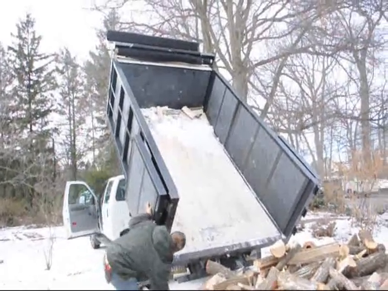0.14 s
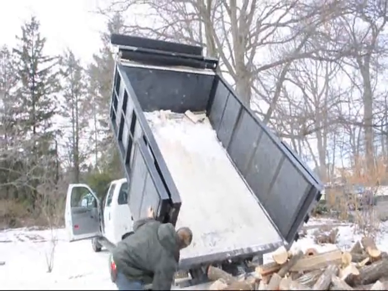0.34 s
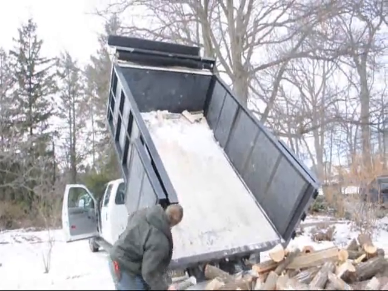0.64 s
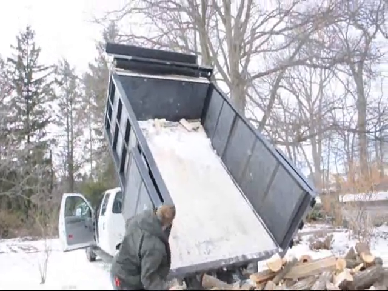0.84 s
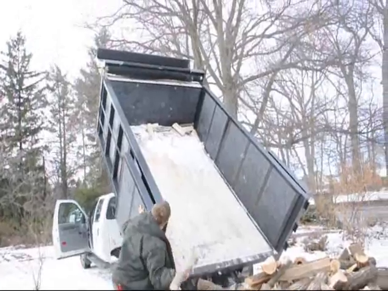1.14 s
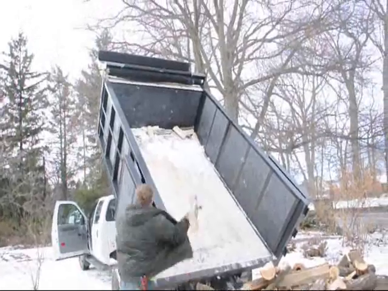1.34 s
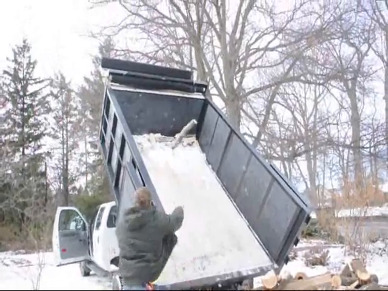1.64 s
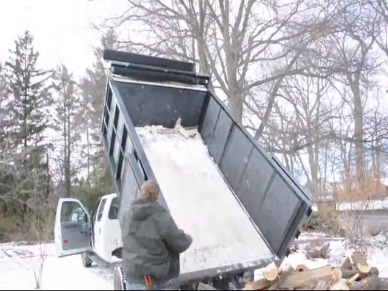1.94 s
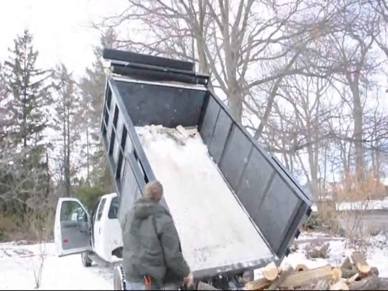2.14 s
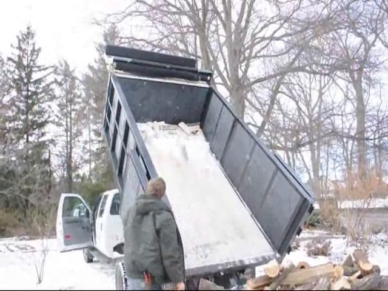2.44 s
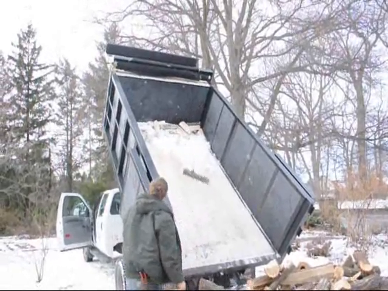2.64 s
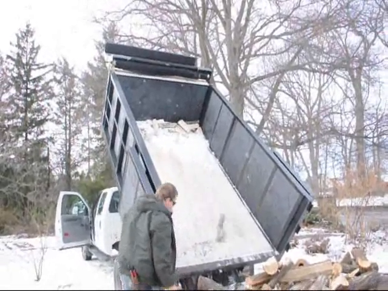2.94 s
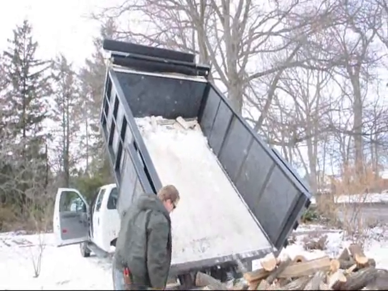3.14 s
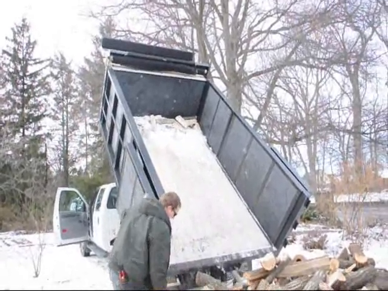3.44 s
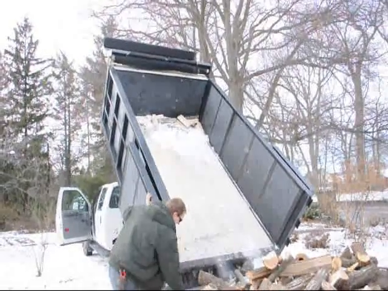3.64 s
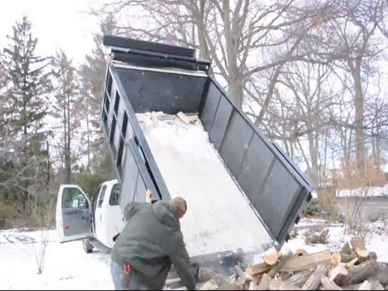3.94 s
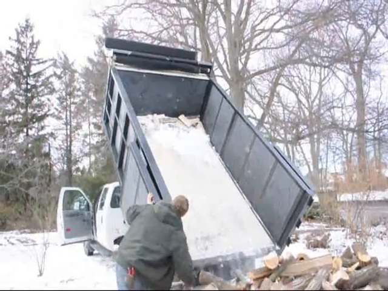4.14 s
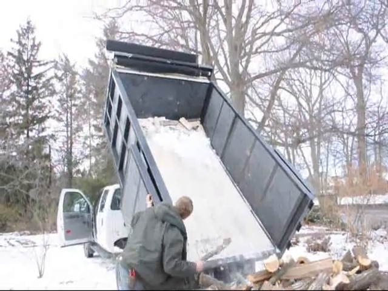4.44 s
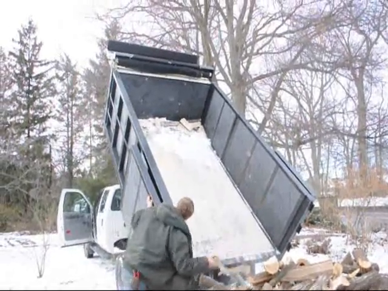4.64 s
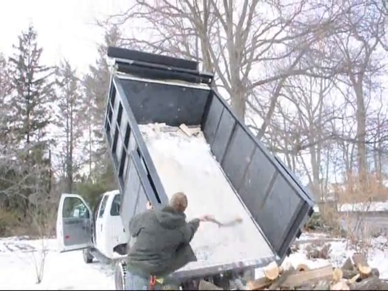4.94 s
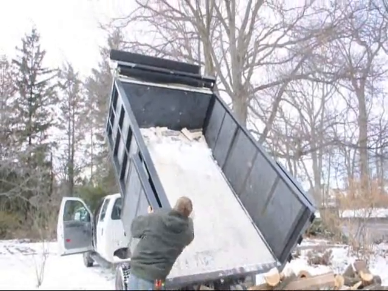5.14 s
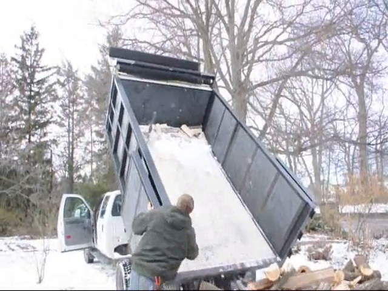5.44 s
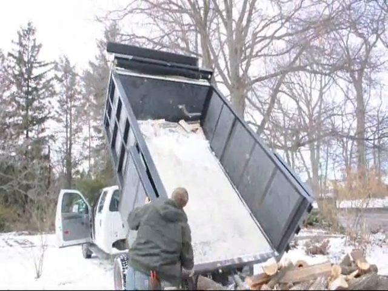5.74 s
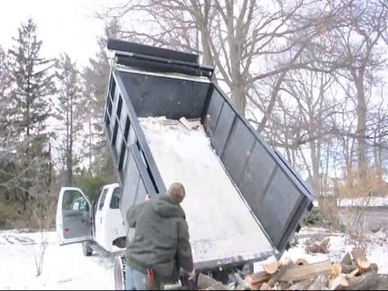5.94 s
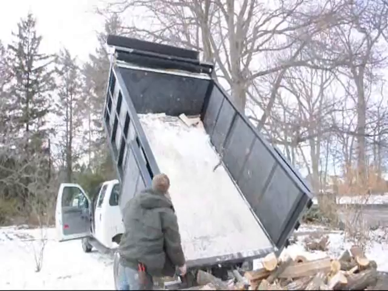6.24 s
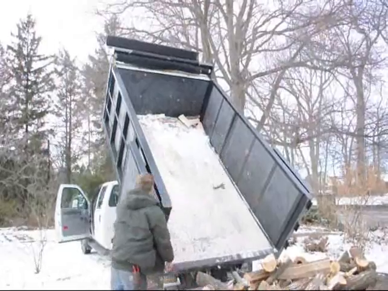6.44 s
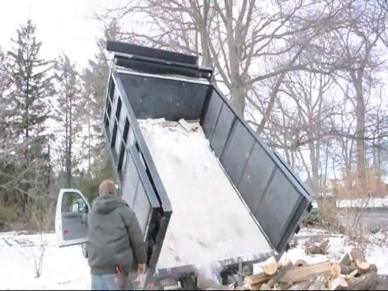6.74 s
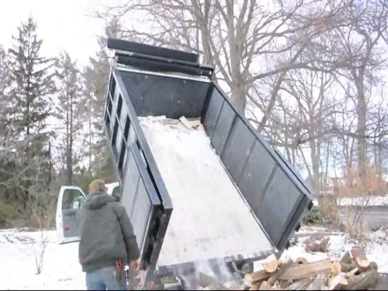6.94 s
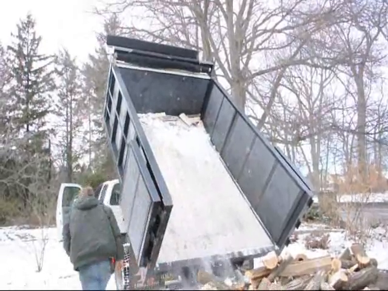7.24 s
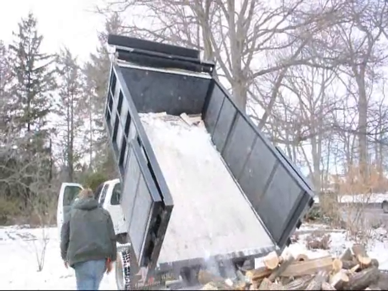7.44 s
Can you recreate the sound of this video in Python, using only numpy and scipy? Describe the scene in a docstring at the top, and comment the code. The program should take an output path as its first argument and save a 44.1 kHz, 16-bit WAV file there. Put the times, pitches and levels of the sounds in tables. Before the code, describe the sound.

Firewood tumbles down a steel dump truck bed in two bursts of booms and knocks, over an idling engine and passing cars.

```python
"""A dump truck idles while a car fades down the road. After one soft blow, firewood tumbles down the
raised steel bed onto a woodpile at 2-3 s: panels boom, logs knock, split faces clack, bark and ice crunch.
From 4 s another car nears. More wood falls at 5-7 s, from 6 s also scraping over the frozen floor.
Throughout, gain control ducks loud blows, a coarse sample-and-hold adds treble images and peaks clip."""
import sys
import numpy as np
from scipy import signal
from scipy.fft import rfft, irfft
from scipy.io import wavfile
from scipy.ndimage import uniform_filter1d

SR = 44100
rng = np.random.default_rng(int(sys.argv[2]) if len(sys.argv) > 2 else 0)


def file_out(sig):
    """Save sig as 16-bit WAV at sys.argv[1]."""
    # one column per channel
    cols = np.atleast_2d(sig).T
    # limit, then scale
    lim = np.clip(cols, -1, 1)
    pcm = np.round(lim * 32767).astype(np.int16)
    wavfile.write(sys.argv[1], SR, pcm)


N = 335160

# stick impacts (time [s], boom [rel. dB], knock [rel. dB], clack [rel. dB], boom pitch [Hz])
IMPACTS = [(0.840, -24.5, -40, -48, 290), (2.143, -31, -22, -19, 254), (2.153, -10.5, -18.5, -30, 256),
           (2.285, -26.5, -30, -35, 384), (2.543, -18.5, -42, -31, 212), (2.575, -6, -12, -20, 254),
           (2.648, -18, -40, -22.5, 182), (2.714, -35, -28, -22.5, 231), (2.722, -10.5, -31, -21.5, 260),
           (2.806, -20.5, -29, -23, 284), (2.872, -11.5, -21, -19, 282), (2.89, -9, -24.5, -28, 270),
           (2.999, -18.5, -30, -11.5, 242), (3.013, -13.5, -27, -24, 260), (3.052, -19, -20, -20.5, 377),
           (3.062, -18, -30, -16.5, 345), (3.097, -8, -14, -20.5, 350), (3.184, -32, -20, -29, 340),
           (4.447, -34, -35.5, -31, 323), (5.213, -14, -26.5, -35, 216), (5.26, -13, -26, -14.5, 220),
           (5.266, -9.5, -8.5, -12, 240), (5.357, -10, -21.5, -27, 258), (5.47, -10, -15, -25.5, 373),
           (5.593, -9.5, -13, -17.5, 326), (6.1, -11, -10, -13, 307), (6.141, -21.5, -19.5, -32, 195),
           (6.302, -21, -32, -22, 221), (6.478, -17, -24.5, -20, 280), (6.644, -9, -17.5, -28, 292),
           (6.835, -19.5, -33, -25, 271), (6.871, -20.5, -24, -21, 370), (6.895, -22.5, -21.5, -22.5, 443),
           (6.921, -22, -33, -40, 242), (7.004, -18, -20, -32, 485), (7.034, -19, -10.5, -23, 446),
           (7.06, -30, -22, -34, 467)]
# tumbling piece (start [s], knock pitch [Hz], thud offset from the impact's boom column [dB])
TUMBLING_PIECES = [(0, 740, -21), (2.1, 650, -10.5), (2.5, 698, -18), (2.8, 930, -13.5), (3.15, 680, -25),
                   (5.1, 925, -30), (5.45, 660, -26), (6.0, 973, -7.5), (6.28, 720, -11), (6.98, 1200, -22)]
# steel floor panels (frequency [Hz], level [rel. dB], t60 [s])
PANEL_MODES = [(94, -25, 0.32), (117, -3, .22), (151.4, -2, 0.26), (181.6, -1.5, 0.22), (211, 4.5, 0.17),
               (236, 0.5, 0.13), (260, -6, 0.35), (297.3, -1, 0.22), (345, -1.5, 0.13), (380, 3, 0.17),
               (423.3, 2, 0.16), (451, -0.5, 0.083), (488, -7, 0.17), (556, -7, 0.086)]
# hollow knock of a log (frequency [Hz], level [rel. dB], t60 [s])
LOG_MODES = [(454, 6, .11), (487, 2, 0.086), (555, 4, 0.045), (636.3, 6, 0.2), (682, 1, 0.34),
             (746, 8.5, 0.065), (860, -11, 0.077), (865, 10, 0.058), (995, 10, 0.071), (1094, -0.5, 0.21),
             (1240, -14, 0.13), (1333, 4.5, 0.17), (1440, -7, 0.05)]
# split wood faces (frequency [Hz], level [rel. dB], t60 [s])
FACE_MODES = [(1430, -7, 0.032), (1560, 12, 0.031), (1660, -14, 0.16), (1980, -11, 0.096),
              (2235, 0.5, 0.079), (2380, -7.5, 0.057), (2560, 2.5, 0.031), (2950, 8, 0.015),
              (3360, -16, 0.11), (3380, 0, 0.024), (4100, -27.5, 0.038), (4570, -28, 0.015)]
# splinter noise (frequency [Hz], level [rel. dB])
SPLINTER_SPECTRUM = [(600, -15), (1000, -12), (1550, 0), (2600, -7), (3600, -20), (5000, -16)]
# larger bark and ice crunches (time [s], level [dB], t60 [s], pitch [ratio])
LARGE_CRUNCHES = [(1.596, -31, .06, 1.33), (5.191, -26, 0.23, 0.96), (5.265, -4, 0.046, 0.93),
                  (5.273, -11, 0.065, 1.03), (5.594, -21, 0.23, 0.97), (6.085, -27, 0.043, 1.06),
                  (6.106, -16.5, 0.23, 1.27), (6.205, -27, 0.16, 1.07), (6.642, -23, 0.065, 0.91),
                  (6.769, -21.5, 0.05, 1.16), (6.812, -25.5, 0.068, 1.06), (7.006, -27, 0.12, 1.1)]
# brittle chips (frequency [Hz], level [rel. dB])
CHIP_SPECTRUM = [(900, -15), (1700, -4), (2000, -4), (2600, -23), (2900, -5.5), (3350, 1.5), (3560, -3),
                 (3800, -2), (4120, -2.5), (4400, -5), (5000, -6), (5400, -11.5)]
# sliding wood (start [s], length [s], level [dB])
SLIDE_SPANS = [(6.103, 0.053, -15.5), (6.268, 0.35, -23), (6.763, 0.18, -24), (6.98, 0.05, -27)]
# bark on the frozen floor (frequency [Hz], level [rel. dB])
SCRAPE_SPECTRUM = [(50, -21), (120, -3.5), (250, 5.5), (480, -3.5), (700, 2.5), (1300, -9.5), (2200, -10),
                   (3500, -22.5), (5000, -26.5)]
# engine drone (crank order [ratio], level [dB])
CRANK_ORDERS = [(4, -69), (7, -57), (8, -54.5), (9, -52), (11, -54), (18, -57), (20, -53), (22, -58)]
# crank speed drift (frequency [Hz], level [rel. dB])
WAVER_SPECTRUM = [(1, 1), (5, -1.5), (20, -70), (100, -140)]
# humming panel (time [s], level [dB])
HUM_CURVE = [(0, -61), (1.2, -43.5), (4, -57), (4.4, -40.5), (5.1, -49), (7.6, -39.5)]
# idle clatter (frequency [Hz], level [rel. dB])
CLATTER_SPECTRUM = [(18, -45), (30, -22), (65, -14), (93, -11), (153, -9.5), (174, -6.5), (290, -7.5),
                    (323, -7.5), (344, -4.5), (563, -12), (760, -5.5), (1440, -9), (1830, -13),
                    (2870, -16.5), (5000, -33), (6500, -10), (11000, -120)]
# engine covers (frequency [Hz], bandwidth [Hz], level [dB])
COVER_BANDS = [(1236, 60, -44.5), (1443, 75, -42), (2897, 170, -50), (4350, 74, -55.5), (4854, 170, -54)]
# tyre roar of passing cars, ducked near 5.7 s by gain control after the loud blows
# (time [s], level [dB], pitch [ratio])
TRAFFIC_CURVES = [(0, -20.5, 0.99), (.5, -23.5, 1.11), (2, -26, 1.01), (3.3, -37, 1.05), (4.1, -41.5, 1.3),
                  (5.2, -33, 1.33), (5.7, -36, 1.38), (6, -27.5, 1.07), (7.6, -26.5, 1.09)]
# tyre roar (frequency [Hz], level [rel. dB])
TYRE_SPECTRUM = [(50, -25), (130, -12), (230, -9.5), (400, -5.5), (560, -6.5), (700, 0), (860, 0),
                 (1100, -3.5), (1450, -6.5), (2000, -14.5), (3000, -25.5), (4500, -31.5)]
# yard reverberation (frequency [Hz], t60 [s])
YARD_DECAY = [(100, 1), (300, 0.39), (700, 0.33), (1500, 0.4), (3000, 0.17), (5000, 0.28)]


def blows(rebound_s=0.027, rebound_spread_s=0.004):
    """Each blow is followed about 27 ms later by the other end of the stick landing: a softer blow at a shifted
    pitch."""
    out = np.zeros(N)
    draws = rng.standard_normal((len(IMPACTS), 3))
    for (s, boom_db, knock_db, clack_db, boom_hz), (late, spot, detune) in zip(IMPACTS, draws):
        knock_hz = piece_at(s)[0] * np.exp(0.042 * spot)
        add(out, s, blow(boom_db, knock_db, clack_db, boom_hz, knock_hz))
        shift = np.exp(0.13 * detune)
        rebound = blow(boom_db - 9, knock_db - 9.5, clack_db - 14, boom_hz * shift, knock_hz * shift)
        add(out, s + rebound_s + rebound_spread_s * late, rebound)
    return out


def blow(boom_db, knock_db, clack_db, boom_hz, knock_hz):
    """One impact: boom in the steel, knock in the log, clack along its split faces."""
    t = np.arange(SR // 3) / SR
    softness = np.clip((boom_db - knock_db - 6.5) / 12, 0, 1)  # snow cushion: weak knock, slow rise
    return (amp(boom_db + 2) * steel_boom(t, boom_hz, rise_s=0.00054 + 0.0035 * softness)
            + amp(knock_db + 0.9) * log_knock(t, knock_hz)
            + amp(clack_db - 0.9) * wood_clack(t))


def steel_boom(t, hz, rise_s):
    """Floor panels ring around the mode favoured by the impact point."""
    panels = ring(PANEL_MODES, t, centre_hz=1.07 * hz, width_oct=1, detune=0.027, damping_db=8.4)
    favoured = unit_onset(tone(hz, t, t60_s=0.077))
    return unit_onset((favoured + 0.85 * panels) * contact(t, rise_s))


def log_knock(t, hz):
    """The log rings hollow around one short favoured mode."""
    hollow = ring(LOG_MODES, t, centre_hz=hz, width_oct=0.68, detune=0.0287, damping_db=9.3)
    favoured = unit_onset(tone(hz, t, t60_s=0.04))
    return unit_onset((0.63 * favoured + hollow) * contact(t, rise_s=0.0006))


def wood_clack(t):
    """Split faces ring over a burst of splinter noise; smaller sticks ring higher and shorter."""
    noise = coloured(rng.standard_normal(len(t)), SPLINTER_SPECTRUM)
    splinters = unit_onset(noise * decay(t, t60_s=0.081))
    smallness = np.exp(0.033 * rng.standard_normal())
    faces = ring(FACE_MODES, t * smallness, centre_hz=2300, width_oct=2.2, detune=0.015, damping_db=3.3)
    return unit_onset((faces + 0.88 * splinters) * contact(t, rise_s=0.0017))


def thuds(chassis_hz=105.4):
    """The chassis gives under each impact, more for heavier pieces."""
    out, t = np.zeros(N), np.arange(SR // 4) / SR
    for (s, boom_db, *_), spot in zip(IMPACTS, rng.standard_normal(len(IMPACTS))):
        sway = tone(chassis_hz * np.exp(0.077 * spot), t, t60_s=0.051)
        thud_db = boom_db + piece_at(s)[1]
        add(out, s, amp(thud_db) * unit_onset(sway * contact(t, rise_s=0.0038)))
    return out


def crunches(cracks_per_s=5000, bark_t60_s=0.045):
    """Showers of tiny fractures: one per impact, plus larger ones. Small chips ring higher."""
    out, t = np.zeros(N), np.arange(SR // 5) / SR
    bark = [(s, clack_db - 14, bark_t60_s, 1) for s, _, _, clack_db, _ in IMPACTS]
    for s, db, t60_s, pitch in list(LARGE_CRUNCHES) + bark:
        chips = coloured(ticks(len(t), cracks_per_s), np.array(CHIP_SPECTRUM) * [pitch, 1])
        add(out, s, amp(db) * unit_onset(chips * decay(t, t60_s)))
    return out


def slides(attack_s=0.031, release_t60_s=0.28, slips_per_s=2200, snags_per_s=65, grit_db=-17):
    """Bark sticks and slips on the floor; ice grains snag the wood and make it ring."""
    t = np.arange(N) / SR
    envelope = np.zeros(N)
    for s, length_s, db in SLIDE_SPANS:
        attack = np.clip((t - s) / attack_s, 0, 1)
        envelope += amp(db) * attack * decay(np.maximum(t - s - length_s, 0), release_t60_s)
    strengths = rng.standard_normal(N) * amp(np.minimum(rng.exponential(1, N), 4))
    slips = strengths * (rng.random(N) < slips_per_s / SR)
    snags = ticks(N, snags_per_s)
    faces = ring(FACE_MODES, t[:SR // 10], centre_hz=3100, width_oct=0.62, detune=0.013, damping_db=3.3)
    grit = unit_rms(signal.oaconvolve(snags, faces)[:N])
    return envelope * (coloured(slips, SCRAPE_SPECTRUM) + amp(grit_db) * grit)


def engine(crank_hz=11.43, clatter_db=-33.5):
    """Idling V8: low crank orders, a humming panel, clatter pulsing with the crank."""
    t = np.arange(N) / SR
    waver = coloured(rng.standard_normal(N), WAVER_SPECTRUM)
    turns = np.cumsum(crank_hz * (1 + 0.003 * waver)) / SR

    def order(multiple):
        return np.sqrt(2) * np.sin(2 * np.pi * (multiple * turns + rng.random()))

    drone = sum(amp(db) * order(multiple) for multiple, db in CRANK_ORDERS)
    hum = amp(curves(HUM_CURVE, t)[0]) * order(28)
    pulsing = 1 + 0.084 * order(4) + 0.088 * order(10) + 0.063 * order(1)
    clatter = coloured(rng.standard_normal(N) * pulsing, CLATTER_SPECTRUM)
    return drone + hum + amp(clatter_db) * clatter


def cover_rattle():
    """Thin engine covers sizzle, each in its own band."""
    out = np.zeros(N)
    for hz, width_hz, db in COVER_BANDS:
        resonance = signal.iirpeak(hz, hz / width_hz, fs=SR)
        out += amp(db) * unit_rms(signal.lfilter(*resonance, rng.standard_normal(N)))
    return out


def traffic(flutter_db=0.9):
    """Tyre roar: one car recedes, another nears and roars higher. The level dips near 5.7 s."""
    hz, t, noise = signal.stft(rng.standard_normal(N), SR, nperseg=1024, noverlap=768)
    level_db, pitch = curves(TRAFFIC_CURVES, t)
    shape = amp(at_hz(TYRE_SPECTRUM, hz[:, None] / pitch))
    shape /= np.sqrt(np.mean(shape ** 2, axis=0))
    flutter = uniform_filter1d(rng.standard_normal(noise.shape), size=8, axis=0)
    flutter = unit_rms(uniform_filter1d(flutter, size=14, axis=1))
    roar = noise * shape * amp(level_db + flutter_db * flutter)
    return signal.istft(roar, SR, nperseg=1024, noverlap=768)[1][:N]


def exhaust(start_hz=150, sag_hz_per_s=17.3, start_db=-36, fade_db_per_s=27):
    """The leaving car's note sags and fades."""
    t = np.arange(N) / SR
    cycles = np.cumsum(start_hz - sag_hz_per_s * t) / SR
    return amp(start_db - fade_db_per_s * t) * np.sqrt(2) * np.sin(2 * np.pi * cycles)


def yard_reverb(x, predelay_s=0.008, rise_s=0.014):
    """Bed walls and trees scatter the sound into a thin tail."""
    hz, t, echoes = signal.stft(ticks(SR, per_s=2500), SR, nperseg=256)
    tail = signal.istft(echoes * decay(t, at_hz(YARD_DECAY, hz)[:, None]), SR, nperseg=256)[1]
    tail *= np.clip((np.arange(len(tail)) / SR - predelay_s) / rise_s, 0, 1)
    return signal.fftconvolve(x, tail / np.linalg.norm(tail))[:N]


def ring(modes, t, centre_hz, width_oct, detune, damping_db):
    """Modes near centre_hz take most of the blow; the log lying against them drains the first swings."""
    hz, db, t60_s = np.transpose(modes)[:, :, None]
    luck, shift, phase = rng.standard_normal((3, len(modes), 1))
    weight = amp(2.05 * luck) / (1 + (np.log2(hz / centre_hz) / width_oct) ** 2)
    swing = np.sin(2 * np.pi * (hz * (1 + detune * shift) * t + phase)) * amp(db) * decay(t, t60_s)
    drain = amp(-damping_db * (1 - np.exp(-t / 0.031)))
    return unit_onset((weight * swing).sum(0) * drain)


def tone(hz, t, t60_s):
    """One damped mode."""
    return np.sin(2 * np.pi * hz * t) * decay(t, t60_s)


def contact(t, rise_s):
    """Force builds smoothly as the wood presses in."""
    return 1 - np.exp(-(t / rise_s) ** 2)


def piece_at(s):
    """(knock pitch [Hz], thud offset [dB]) of the piece tumbling at time s."""
    starts_s = [row[0] for row in TUMBLING_PIECES]
    return TUMBLING_PIECES[max(np.searchsorted(starts_s, s) - 1, 0)][1:]


def ticks(samples, per_s):
    """Sparse random impulses."""
    return rng.standard_normal(samples) * (rng.random(samples) < per_s / SR)


def amp(db):
    """Decibels to gain."""
    return 10 ** (np.asarray(db) / 20)


def decay(t, t60_s):
    """Falls 60 dB per t60_s."""
    return amp(-60 * t / t60_s)


def unit_rms(x):
    """Scales to rms 1."""
    return x / np.sqrt(np.mean(x ** 2) + 1e-20)


def unit_onset(x):
    """Scales to rms 1 over the first 15 ms."""
    return x / np.sqrt(np.mean(x[:660] ** 2) + 1e-20)


def at_hz(table, hz):
    """Interpolates a table over log frequency."""
    table_hz, values = np.transpose(table)
    return np.interp(np.log(hz + 1), np.log(table_hz + 1), values)


def curves(table, t):
    """Interpolates each column over time."""
    s, *columns = np.transpose(table)
    return [np.interp(t, s, column) for column in columns]


def coloured(x, spectrum):
    """Filters x by a spectrum table, to rms 1."""
    gain = amp(at_hz(spectrum, np.fft.rfftfreq(len(x), 1 / SR)))
    return unit_rms(irfft(rfft(x) * gain, len(x)))


def add(mix, s, sound):
    """Mixes a sound in at time s."""
    part = mix[round(s * SR):][:len(sound)]
    part += sound[:len(part)]


def low_pass(x, hz, taps):
    """Steep FIR low-pass."""
    return signal.oaconvolve(x, signal.firwin(taps, hz, window=("kaiser", 7), fs=SR), "same")


def gain_control(x, threshold_db=-12.5, recovery_db_per_s=46.4, lag_s=0.017):
    """Ducks by 55% of the held level's excess over the threshold."""
    power_db = 10 * np.log10(signal.lfilter(np.ones(441) / 441, 1, x ** 2) + 1e-12)
    fall_db = np.arange(N) * recovery_db_per_s / SR
    held_db = np.maximum.accumulate(power_db + fall_db) - fall_db
    over_db = np.maximum(held_db - threshold_db, 0)
    pole = np.exp(-1 / (lag_s * SR))
    return x * amp(-0.55 * signal.lfilter([1 - pole], [1, -pole], over_db))


def scene():
    """Wood on steel over engine and road; the open bed radiates little deep bass."""
    bass_cut = signal.butter(2, 90, "high", fs=SR, output="sos")
    bed = signal.sosfilt(bass_cut, blows()) + thuds() + crunches() + slides()
    return (bed + amp(-11) * yard_reverb(bed) + engine() + cover_rattle() + traffic() + exhaust())[None]


def record(dry):
    """Gain control ducks after blows; held samples mirror the sound into the treble; peaks clip."""
    hold_samples = 4
    ducked = low_pass(gain_control(dry[0]), hz=5400, taps=81)
    held = np.repeat(ducked[::hold_samples], hold_samples)[:N]
    clipped = np.clip(held, -0.93, 0.93)
    return low_pass(clipped, hz=15550, taps=511)[None]


dry = scene()
out = record(dry)
file_out(out)
```